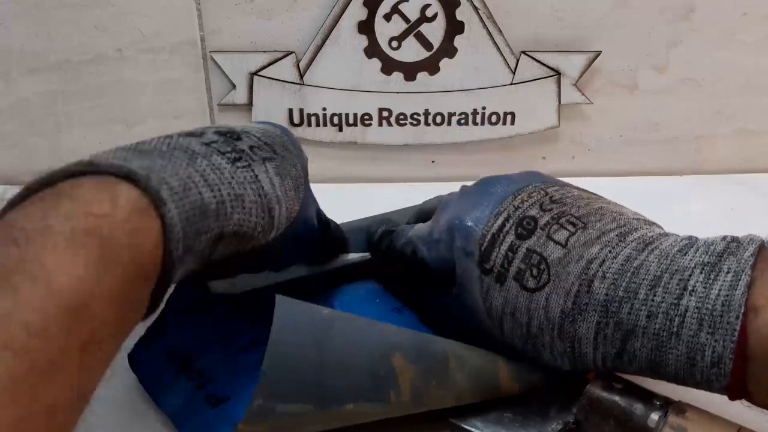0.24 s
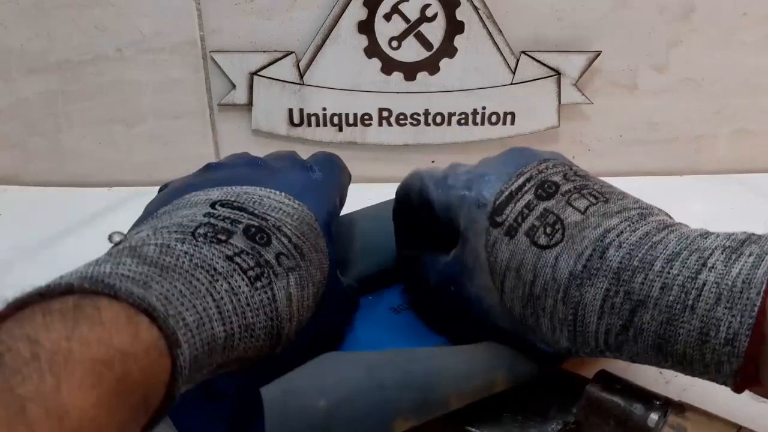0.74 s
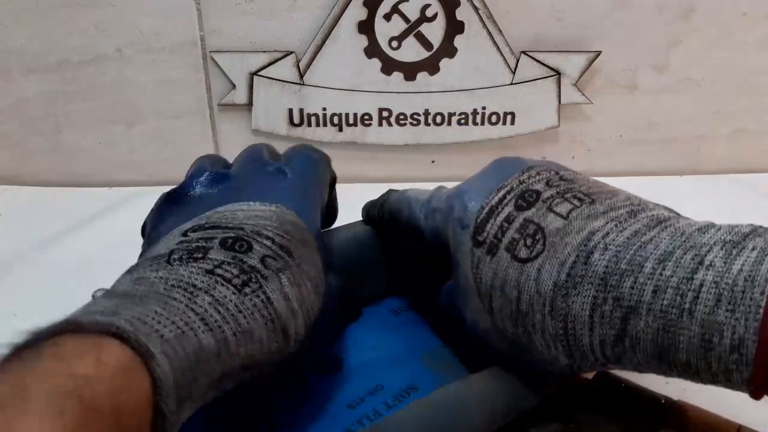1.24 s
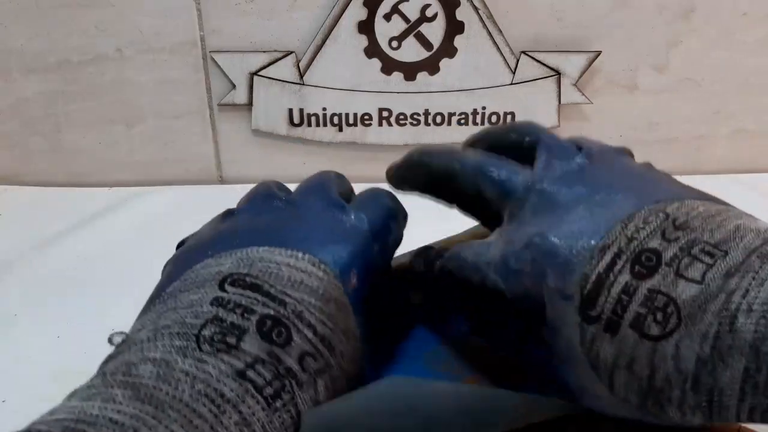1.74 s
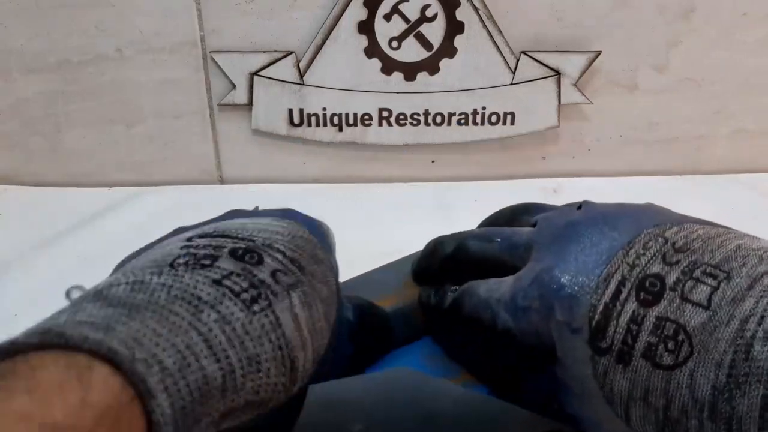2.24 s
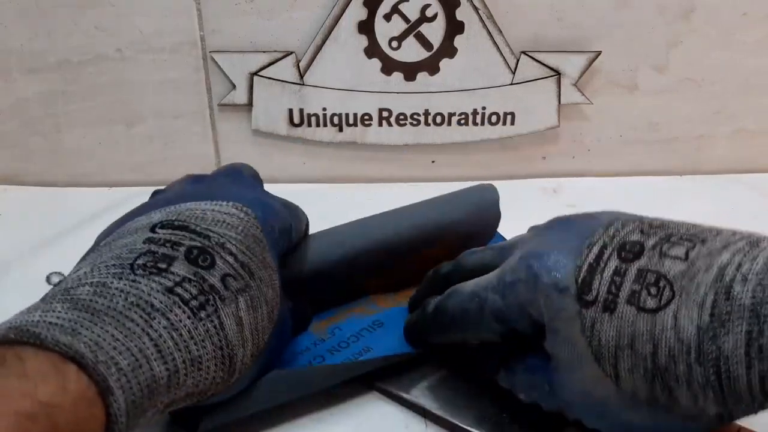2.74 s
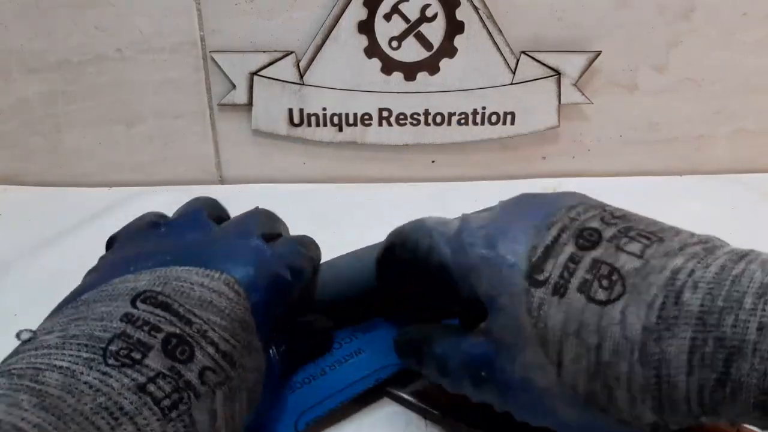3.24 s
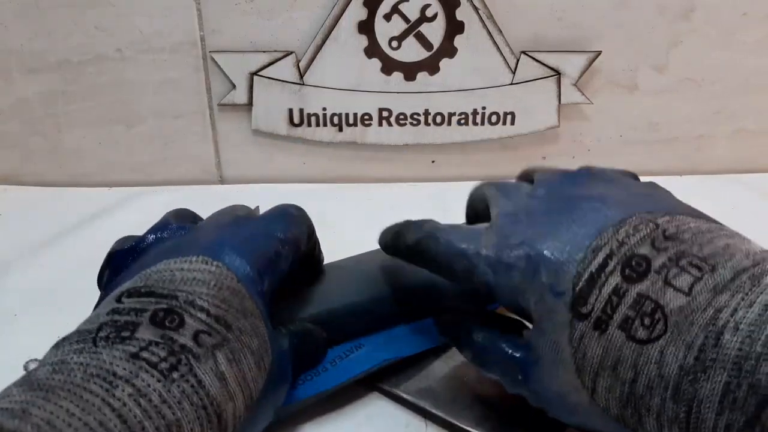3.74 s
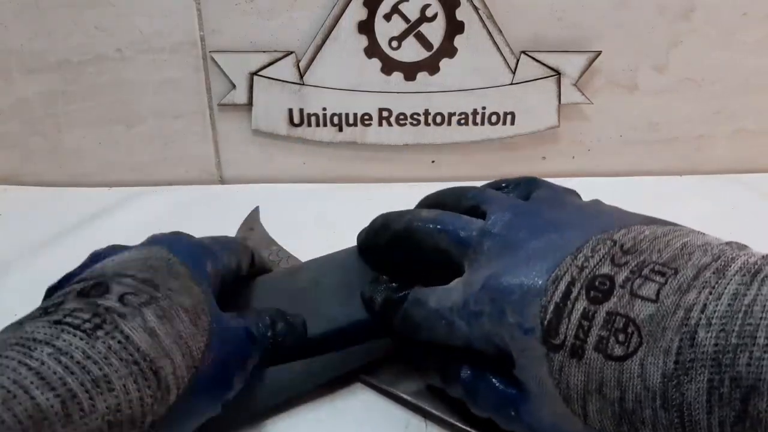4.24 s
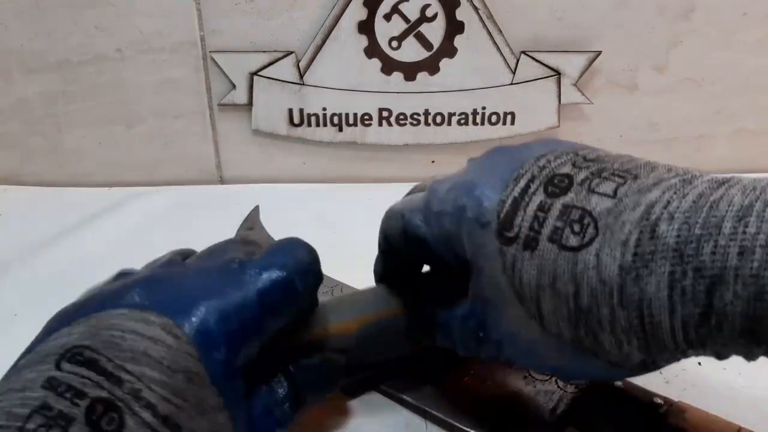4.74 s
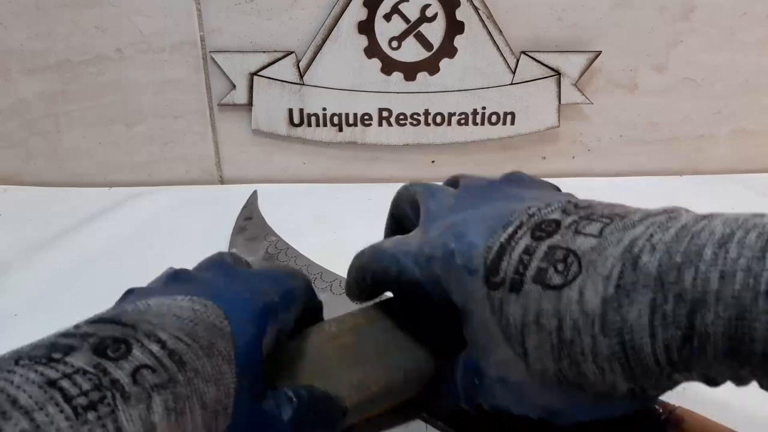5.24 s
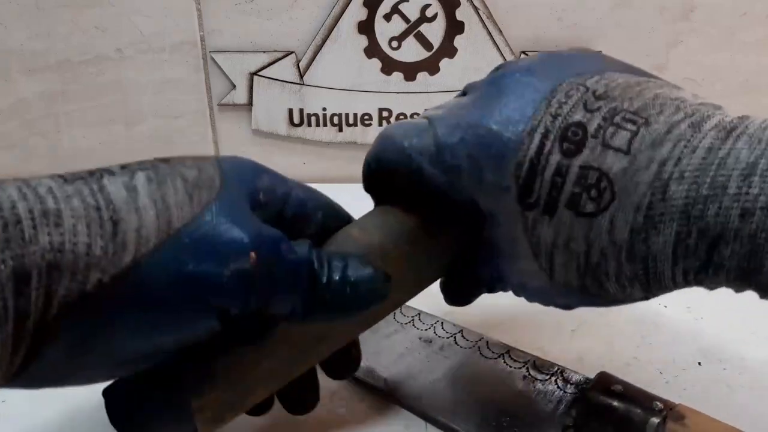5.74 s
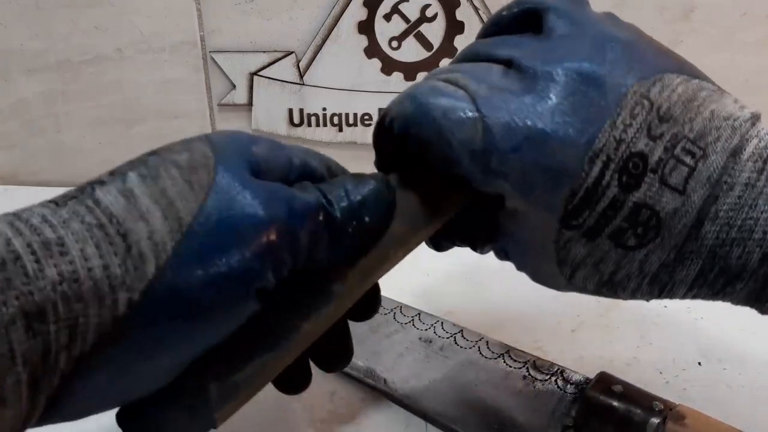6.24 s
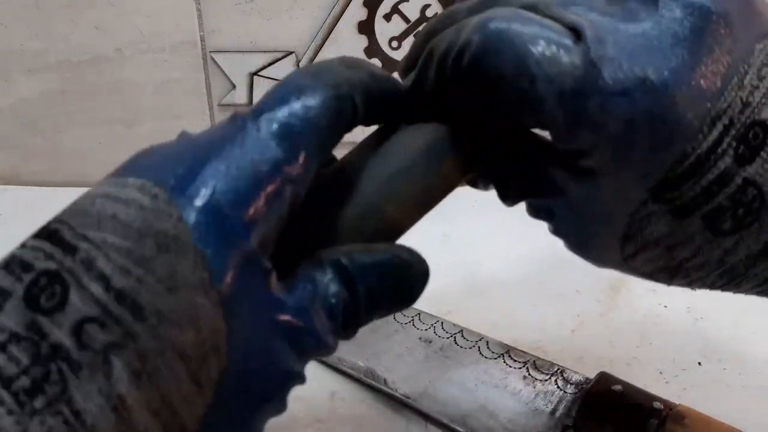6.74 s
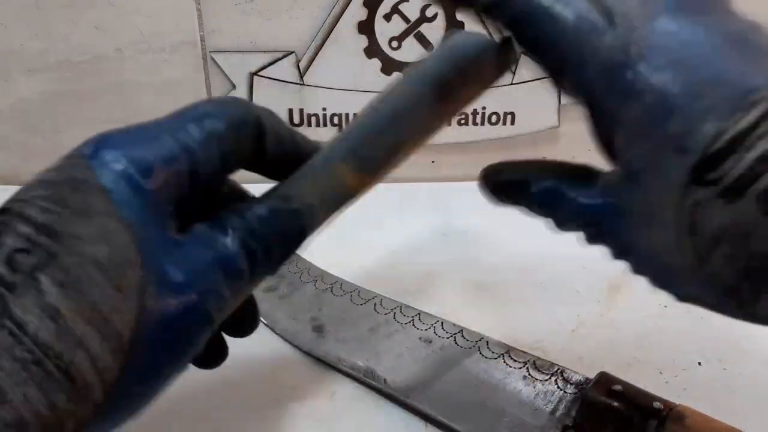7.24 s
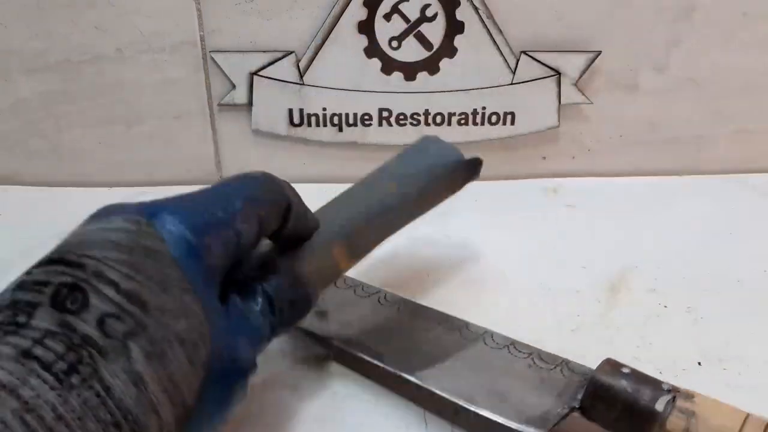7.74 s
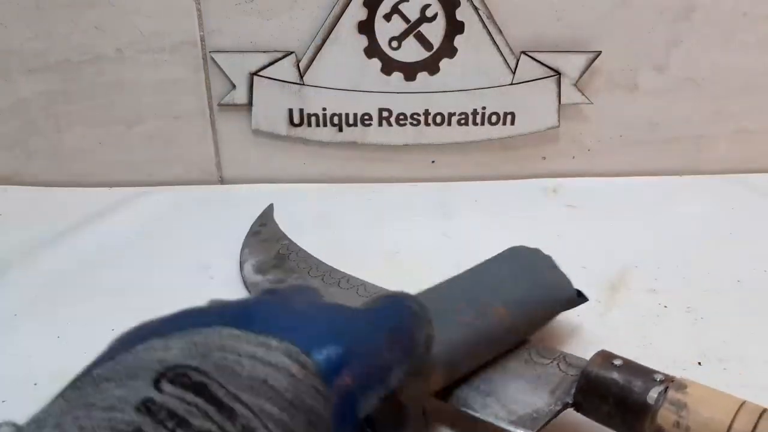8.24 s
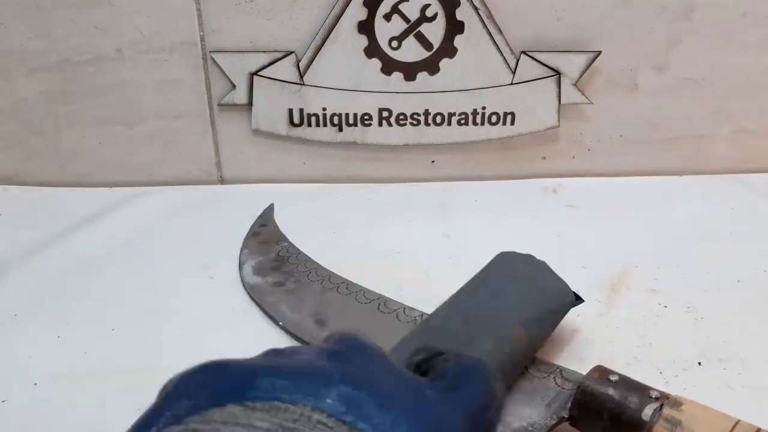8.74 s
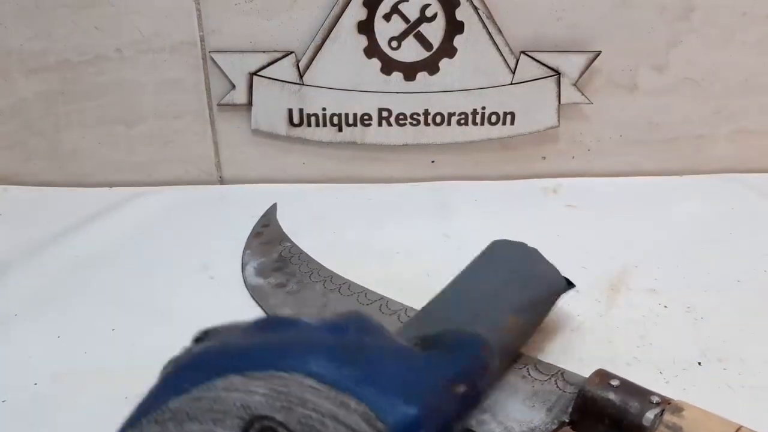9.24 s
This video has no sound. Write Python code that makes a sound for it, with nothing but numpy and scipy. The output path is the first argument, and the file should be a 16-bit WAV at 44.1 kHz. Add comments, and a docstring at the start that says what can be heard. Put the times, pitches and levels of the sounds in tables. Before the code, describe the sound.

Gloved hands work a stiff gritty sheet on a workbench, very close and dry with a short room reflection. Irregular scuffs, snaps and ticks come in bursts, with a sharp stone-on-steel knock around two seconds and others later, over bench thuds. After five seconds it thins to soft slips. A knock precedes fast grinding strokes on steel, seven or eight a second, until the end.

```python
"""Gloved hands wrap a stiff sheet of abrasive paper round a stone on a workbench in a small hard room.
From the start the sheet rustles, ticks and snaps, a fold breaks early on, the stone knocks on a steel
blade and the bench booms; later, rubber gloves swish. Over the last second and a half the wrapped stone
rubs along the blade in quick strokes, seven or eight a second, and catches on its edge.
Friction is random grit clicks through filters; blows are short clicks through resonances."""
import sys
import numpy as np
from scipy import signal
from scipy.fft import rfft, irfft
from scipy.io import wavfile
from scipy.ndimage import map_coordinates

SR = 44100
rng = np.random.default_rng(int(sys.argv[2]) if len(sys.argv) > 2 else 0)


def inscribe(sig):
    """Save sig as 16-bit PCM at rate SR to the path in sys.argv[1].

    A 1-D sig is mono; a 2-D sig holds one channel per row.
    Samples are clipped to [-1, 1] before scaling.
    """
    pcm = np.round(np.clip(np.atleast_2d(sig).T, -1, 1) * 32767)
    wavfile.write(sys.argv[1], SR, pcm.astype(np.int16))


N = 418509
TIME = np.arange(N) / SR


def from_db(db):
    """Decibels to gain."""
    return 10 ** (np.asarray(db) / 20)


def rms_one(x):
    """Scale to rms 1."""
    return x / np.sqrt(np.mean(x ** 2) + 1e-20)


def burst_one(x):
    """Scale each channel to the energy of 10 ms at rms 1."""
    energy = np.sum(x ** 2, axis=-1, keepdims=True)
    return x / np.sqrt(energy / (0.01 * SR) + 1e-20)


def at_hz(points, hz):
    """Read a table on a log-frequency axis."""
    point_hz, value = np.transpose(points)
    return np.interp(np.log(np.maximum(hz, 1)), np.log(point_hz), value)


def add(out, start_s, sound):
    """Mix a sound in at its start time."""
    i = max(round(start_s * SR), 0)
    out[..., i:i + sound.shape[-1]] += sound[..., :N - i]


def convolve(x, response):
    """Filter by an impulse response, keeping the length."""
    return signal.oaconvolve(np.atleast_2d(x), np.atleast_2d(response), axes=-1)[:, :x.shape[-1]]


def coloured(x, spectrum, size=4096):
    """Causal (minimum-phase) filter with the given spectrum."""
    hz = np.arange(size // 2 + 1) * SR / size
    cepstrum = irfft(np.log(from_db(at_hz(spectrum, hz))))
    # folding the cepstrum forward in time makes the filter minimum-phase
    cepstrum[1:size // 2] *= 2
    cepstrum[size // 2 + 1:] = 0
    return convolve(x, irfft(np.exp(rfft(cepstrum))))


def resonance(x, hz, width_hz):
    """Two-pole band-pass."""
    r = np.exp(-np.pi * width_hz / SR)
    return signal.lfilter([1, 0, -1], [1, -2 * r * np.cos(2 * np.pi * hz / SR), r * r], x)


def low_pass(x, hz, order=2):
    """Butterworth low-pass."""
    return signal.sosfilt(signal.butter(order, hz, fs=SR, output="sos"), x)


def drift(per_s, size=16):
    """Smooth random wander with a spread near 1, from per_s random knots a second."""
    knots = rng.standard_normal(4000)
    coarse = map_coordinates(knots, [TIME[::size] * per_s], order=2, mode="wrap")
    return np.repeat(coarse, size)[:N]


def ringing(modes, t, scatter_db):
    """Decaying modes, each struck with a strength of its own."""
    out = 0
    for k, (hz, db, t60_s) in enumerate(modes):
        decay = from_db(db + scatter_db * rng.normal() - 60 * t / t60_s)
        out = out + decay * np.sin(2 * np.pi * hz * t) * (-1) ** k
    return out


def grains(per_s, spread_db):
    """Grit catching and letting go: random clicks of very uneven size."""
    sizes = from_db(spread_db * np.minimum(rng.exponential(1, N), 5))
    return rms_one((rng.random(N) < per_s / SR) * sizes * rng.choice([-1, 1], N))


def friction(spectrum, per_s, spread_db, apart_db):
    """Grains over a wide contact, partly different at the two microphones."""
    shared = grains(per_s, spread_db)
    apart = from_db(apart_db) * grains(per_s, spread_db) * [[1], [-1]]
    return rms_one(coloured(shared + apart, spectrum))


def contact(decay_s, chatter_db, apart_db, size=4096):
    """One sharp click, then a dying noise chatter, up to 6 samples apart at the two microphones."""
    t = np.arange(size) / SR
    envelope = np.exp(-t / decay_s) * (1 - np.exp(-t / 0.0002))
    mid, side = rng.standard_normal((2, size)) * envelope
    both = (t == 0) + from_db(chatter_db) * (mid + from_db(apart_db) * side * [[1], [-1]])
    return np.array([np.roll(channel, lag) for channel, lag in zip(both, rng.integers(0, 7, 2))])


# colour of the room tone: pitch_hz [Hz], level_db [dB, relative]
ROOM_TONE = [(25, -15.5), (80, 14.5), (300, -17.5), (800, -0.5), (2000, -20.5), (7000, -10), (16000, -16.5)]


def room_tone():
    """Faint steady noise, independent at the two microphones."""
    return from_db(-73.5) * rms_one(coloured(rng.standard_normal((2, N)), ROOM_TONE))


# reverberation time of the small hard room: pitch_hz [Hz], t60_s [s]
ROOM_T60 = [(100, 0.35), (300, 0.56), (800, 0.29), (2000, 0.34), (5000, 0.22), (14000, 0.17)]


def room(x):
    """Dense reflections, different at each microphone, dying band by band."""
    t = np.arange(SR // 2) / SR
    edges_hz = np.geomspace(60, 19000, 9)
    white, tail = rng.standard_normal((2, len(t))), 0
    bins_hz = np.fft.rfftfreq(len(t), 1 / SR)
    for low, high in zip(edges_hz, edges_hz[1:]):
        inside = abs(bins_hz - (low + high) / 2) < (high - low) / 2
        band = irfft(rfft(white) * inside, len(t))
        tail = tail + band * from_db(-60 * t / at_hz(ROOM_T60, np.sqrt(low * high)))
    tail = tail * (1 - np.exp(-t / 0.00046))
    return convolve(x, tail / np.sqrt(np.sum(tail ** 2) / 2))


# hands and stone press on the bench top: start_s [s], level_db [dB before filtering], hardness_hz [Hz]
BUMPS = [(.285, -35.5, 140), (0.383, -36, 890), (0.977, -50.5, 120), (1.43, -49.5, 200), (1.798, -47, 130),
         (1.961, -28, 140), (2.245, -38, 90), (2.553, -33.5, 264), (3.449, -49, 300), (3.558, -41, 140),
         (3.916, -51, 250), (4.44, -50, 220), (4.613, -40, 131), (4.972, -47, 153), (7.493, -45.5, 221.5),
         (7.622, -48, 200), (7.668, -41.5, 304), (8.476, -51, 250)]
# modes of the bench top: pitch_hz [Hz], level_db [dB, relative], t60_s [s]
BENCH_MODES = [(57, -11, 0.46), (77.6, -0.5, 0.75), (106, -4, 0.46), (138, -6, 0.15), (162, -12, 0.1),
               (200, -0.5, 0.23)]


def bench():
    """Pushes swell into the low modes of the bench top; harder ones reach its higher modes."""
    out, t = np.zeros(N), np.arange(SR) / SR
    for start_s, level_db, hardness_hz in BUMPS:
        boom = ringing(BENCH_MODES, t, scatter_db=0.5) * (1 - np.exp(-t / 0.0029))
        add(out, start_s, from_db(level_db) * low_pass(boom, hardness_hz))
    return signal.sosfilt(signal.butter(4, 46, "high", fs=SR, output="sos"), out)


def bench_murmur(rubbing):
    """Pushing on the sheet also shakes the higher modes of the bench top."""
    shake = low_pass(rubbing.mean(axis=0), hz=405)
    boom = sum(from_db(db) * rms_one(resonance(shake, hz, width_hz=64)) for hz, db, _ in BENCH_MODES[2:])
    return from_db(-58.5) * rms_one(boom)


# hard knocks of stone on blade, plus some dry sheet snaps and dull bumps, all with a rattle:
# start_s [s], level_db [dB], rattle_s [s, decay], hardness_hz [Hz]
KNOCKS = [(0.3146, -24.5, 0.0015, 4200), (0.3785, -27.5, 0.0071, 350), (1.9544, -12, 0.025, 3960),
          (2.5523, -16, 0.01, 2320), (2.575, -23, .015, 330), (3.45, -25.5, 0.0022, 6000),
          (6.415, -45.5, .01, 900), (7.6671, -22.5, 0.026, 1730), (7.8954, -39.5, 0.0097, 3000),
          (8.4726, -28, 0.0043, 2600)]
# colour of the rattle: pitch_hz [Hz], level_db [dB, relative]
KNOCK_BODY = [(50, -16), (150, -4.5), (330, -0.5), (520, -2), (850, 5), (1300, -1), (3000, -6.5),
              (7000, -8), (16000, -17.5)]
# short ring under each blow, as of a blade on a bench: pitch_hz [Hz], level_db [dB, relative], t60_s [s]
BLADE_MODES = [(323, 7, 0.1), (436, -15.5, 0.38), (607, -17.5, 0.49), (830, -1, 0.19), (1140, -12, 0.28),
               (1390, 1.5, 0.077), (1410, -12, 0.52), (1630, -15, 0.2), (1810, -26, 0.29),
               (1850, -0.5, 0.18), (2236, -20, 0.14), (2500, -26, 0.24)]


def knocks():
    """Each blow is a filtered rattle over a brief ring; hardness sets how bright the rattle is."""
    out, t = np.zeros((2, N)), np.arange(SR // 2) / SR
    for start_s, level_db, rattle_s, hardness_hz in KNOCKS:
        rattle = contact(rattle_s, chatter_db=-11.5, apart_db=-2.0)
        rattle = low_pass(coloured(rattle, KNOCK_BODY), hardness_hz)
        add(out, start_s, from_db(level_db) * burst_one(rattle))
        ring = ringing(BLADE_MODES, t, scatter_db=-2.5)
        add(out, start_s, from_db(level_db - 7.5) * burst_one(ring))
    return out


# rubber gloves slip on the wrapped stone: peak_s [s], half_length_s [s, to 1/e], level_db [dB]
SWISHES = [(4.934, 0.019, -33), (6.54, 0.021, -47), (6.628, 0.017, -52), (6.788, 0.01, -55.5),
           (6.863, .022, -53.5), (6.915, 0.011, -54)]


def gloves():
    """Rubber slipping over grit gives a narrow, high, crackly swish."""
    slips = np.array([grains(per_s=2900, spread_db=8.5) for _ in range(2)])
    swish = resonance(slips, hz=5600, width_hz=2200)
    swish = rms_one(resonance(swish, hz=6000, width_hz=3500))
    return swish * sum(from_db(db) * np.exp(-((TIME - s) / length_s) ** 2) for s, length_s, db in SWISHES)


# light rubbing of gloves never quite at rest on the sheet, before the trims below:
# time_s [s], rustle_db [dB], scratch_db [dB]
FIDGET = [(0.0, -41, -47), (0.24, -53.5, -48), (0.5, -48.5, -49.5), (0.98, -55, -55.5), (1.21, -58, -56.5),
          (1.35, -53, -46), (1.77, -54.5, -58.5), (1.95, -42, -42), (2.33, -55, -55), (2.71, -54, -52),
          (3.9, -57.5, -55.5), (4.22, -50, -51.5), (4.66, -50.5, -54), (4.9, -51, -48), (5.18, -41, -51),
          (5.83, -57.5, -55), (7.15, -63, -59)]
# the hands hold still and the light rubbing drops: middle_s [s], length_s [s], drop_db [dB]
RESTS = [(0.082, 0.13, 7.5), (1.096, 0.027, 6.5), (1.882, .05, 4.5), (2.186, 0.049, 17), (2.31, 0.031, 8),
         (3.715, 0.11, 11), (4.55, 0.13, 3.5), (5.723, 0.048, 18), (6.721, .08, 11), (7.386, 0.27, 18.5)]
FIDGET_RUSTLE_DB, FIDGET_SCRATCH_DB = -3.5, -4.5   # trims


def fidget():
    """Gains of the rustle and the scratch that go on between slides and drop at each rest."""
    s, rustle_db, scratch_db = np.transpose(FIDGET)
    rest_db = 0
    for middle_s, length_s, drop_db in RESTS:
        rest_db = rest_db + drop_db * np.exp(-np.minimum(2 * abs(TIME - middle_s) / length_s, 2) ** 6)
    return (from_db(np.interp(TIME, s, rustle_db) + FIDGET_RUSTLE_DB - rest_db),
            from_db(np.interp(TIME, s, scratch_db) + FIDGET_SCRATCH_DB - rest_db))


def speed_of(peak_s, length_s):
    """A hand movement gathers speed, peaks and dies away."""
    swell = 0.51      # share of the length spent gathering speed
    flatness = 3.42   # 2 is a bell; higher holds the top speed for longer
    part = slice(max(int((peak_s - 2 * length_s) * SR), 0), int((peak_s + 2 * length_s) * SR))
    t = TIME[part] - peak_s
    side_s = length_s * np.where(t < 0, swell, 1 - swell)
    return part, np.exp(-abs(t / side_s) ** flatness)


# pushes of the sheet over the stone; from 8 s on, pitched grinding of stone on blade:
# peak_s [s], length_s [s], rustle_db [dB], pitch_hz [Hz], scratch_db [dB re rustle]
SLIDES = [(0.343, 0.19, -41, 855, -16), (0.472, 0.059, -48, 1070, -0.5), (0.62, .1, -37, 1140, -7),
          (0.731, 0.03, -41, 990, -6), (0.849, 0.034, -46, 850, -10), (0.968, 0.06, -51.5, 836, -8),
          (1.234, 0.082, -42.5, 850, -1), (1.37, .18, -41, 990, -9), (1.63, 0.076, -46, 840, -37),
          (1.775, 0.074, -37.5, 1320, -12), (2.127, 0.079, -43, 930, -6.5), (2.232, 0.034, -42, 1000, -8.5),
          (2.368, 0.023, -39, 1480, -7.5), (2.507, 0.13, -38.5, 1550, 5), (2.582, .13, -34.5, 835, -4.5),
          (2.786, 0.094, -39.5, 930, -8), (2.944, 0.19, -39, 1010, -8), (3.154, 0.063, -43, 1100, -15),
          (3.282, 0.072, -46, 750, -7), (3.445, .012, -27.5, 1000, -12.5), (3.547, 0.03, -36, 775, -9),
          (3.639, 0.067, -49, 930, 1), (3.804, .07, -52.5, 995, -37), (3.906, 0.048, -42, 780, -23),
          (4.107, 0.13, -43.5, 840, -6), (4.201, 0.074, -41, 900, -3.5), (4.374, 0.049, -35.5, 850, -10),
          (4.429, 0.038, -32.5, 1420, -9.5), (4.747, 0.15, -45.5, 1050, -0.5), (4.83, 0.047, -44, 840, -13),
          (4.961, 0.051, -31, 1170, -4), (5.083, 0.047, -34, 1140, -9.5), (5.208, 0.11, -30.5, 1230, -2),
          (5.324, 0.13, -42.5, 1130, 1), (5.479, 0.019, -48.5, 1350, 4.5), (5.585, 0.18, -47.5, 1110, 1.5),
          (5.874, .14, -55.5, 1370, 6), (6.353, 0.12, -50, 1405, -1.5), (6.533, 0.049, -50, 1440, -1),
          (6.625, .08, -56.5, 1770, 3.5), (6.932, 0.077, -69, 1100, -3), (7.162, .08, -58, 1220, -1),
          (7.629, .11, -64.5, 950, 1), (7.796, 0.05, -59.5, 760, -3), (7.943, 0.077, -47, 1100, -8),
          (8.076, .1, -39.5, 1275, -13), (8.466, 0.029, -34, 1290, -10), (9.107, 0.037, -47.5, 1300, 10.5),
          (9.384, 0.067, -39.5, 1900, 2)]
# moments when the sliding grit hisses finely, some of them on steel:
# peak_s [s], length_s [s], level_db [dB]
FINE_SLIDES = [(1.953, 0.032, -33), (2.509, 0.057, -26.5), (3.642, .05, -51), (4.745, 0.038, -41),
               (7.147, 0.047, -59), (7.901, 0.017, -43), (8.447, 0.031, -24.5)]
# colour of the rustle: pitch_hz [Hz], level_db [dB, relative]
RUSTLE = [(40, -29.5), (110, -27), (290, 4), (520, -1), (780, 1.5), (1100, -8.5), (1550, -3.5), (2300, -6),
          (4000, -18), (9000, -40.5)]
# colour of the scratching grit: pitch_hz [Hz], level_db [dB, relative]
SCRATCH = [(1000, -13), (2500, 1), (4000, 0), (5200, -0.5), (6600, -0.5), (8500, -8), (16000, -26)]
# colour of the fine grit: pitch_hz [Hz], level_db [dB, relative]
FINE_HISS = [(3000, -38), (6500, 2.5), (8500, 3), (13000, -0.5), (16000, -4.5)]


def handling():
    """Coarse grit rustles at a pitch of its own in each slide, fine grit hisses; slides swell and fade."""
    grip = drift(per_s=90)
    crinkle = from_db(2.0 * grip) * friction(RUSTLE, per_s=1700, spread_db=2.5, apart_db=-4.5)
    hollow = rms_one(resonance(crinkle, hz=757, width_hz=29))   # the hollow of the rolled sheet
    crinkle = rms_one(crinkle + from_db(-14.5) * hollow)
    scratch = from_db(1.8 * grip) * friction(SCRATCH, per_s=9000, spread_db=3.0, apart_db=-1.0)
    fine = from_db(2.2 * grip) * friction(FINE_HISS, per_s=12000, spread_db=3.5, apart_db=1.5)
    grit = scratch + from_db(-0.5) * fine

    light_rustle, light_scratch = fidget()
    loose = rms_one(from_db(-9.5) * crinkle + rms_one(resonance(crinkle, hz=1100, width_hz=990)))
    sway = from_db(0.5 * drift(per_s=22))
    out = sway * (light_rustle * loose + light_scratch * grit)

    for peak_s, length_s, rustle_db, pitch_hz, scratch_db in SLIDES:
        part, speed = speed_of(peak_s, length_s)
        pitched = rms_one(resonance(crinkle[:, part], pitch_hz, 0.8 * pitch_hz))
        rustle = rms_one(rms_one(crinkle[:, part]) + from_db(5.0) * pitched)
        out[:, part] += from_db(rustle_db) * speed * (rustle + from_db(scratch_db) * grit[:, part])
    for peak_s, length_s, level_db in FINE_SLIDES:
        part, speed = speed_of(peak_s, length_s)
        out[:, part] += from_db(level_db) * speed * fine[:, part]
    return out


# colour of a creasing crack: pitch_hz [Hz], level_db [dB, relative]
CRACK = [(300, -29.5), (1400, 0), (2200, 10.5), (2900, 4.5), (4200, 0.5), (6500, -3.5), (9000, -7.5),
         (16000, -20.5)]


def snap(pop_db, pitch_hz, crack_db, thud_db):
    """A panel of the sheet flips over: a damped pop, a thud of what lies under it, a crack from the crease."""
    flip = contact(decay_s=0.0036, chatter_db=-14.0, apart_db=-7.5)
    pop = resonance(resonance(flip, pitch_hz, 0.53 * pitch_hz), pitch_hz, 1.3 * pitch_hz)
    pop = low_pass(pop, 3.5 * pitch_hz)
    thud = low_pass(resonance(flip, hz=338, width_hz=165), hz=560)
    crack = coloured(flip, CRACK)
    sheet = from_db(pop_db) * (burst_one(pop) + from_db(crack_db) * burst_one(crack))
    return sheet + from_db(thud_db) * burst_one(thud)


TICKS_PER_S, WRAPPING_S = 8, 5.7
TICK_DB, TICK_SPREAD_DB = -0.5, -7.5   # re the rustle of that moment
TICK_HZ, TICK_SPREAD_OCTAVES = 850, 0.16


def ticks():
    """Small creases give way at random during the wrapping, louder while the sheet is being pushed."""
    out, effort = np.zeros((2, N)), fidget()[0]
    for peak_s, length_s, rustle_db, _, _ in SLIDES:
        part, speed = speed_of(peak_s, length_s)
        effort[part] = np.maximum(effort[part], from_db(rustle_db) * speed)
    for when, size, pitch in rng.random((round(TICKS_PER_S * WRAPPING_S), 3)):
        start_s = when * WRAPPING_S
        level_db = TICK_DB + TICK_SPREAD_DB * (2 * size - 1)
        pitch_hz = TICK_HZ * 2 ** (TICK_SPREAD_OCTAVES * (2 * pitch - 1))
        tick = snap(level_db, pitch_hz, crack_db=2, thud_db=level_db - 0.5)
        add(out, start_s, effort[int(start_s * SR)] * tick)
    return out


# the sheet buckles or is tapped: start_s [s], pop_db [dB], pitch_hz [Hz], crack_db [dB re pop]
SNAPS = [(0.2563, -30, 1550, 1), (0.3135, -18.5, 1600, -5.5), (0.5057, -32, 1410, -1.5),
         (0.6672, -18.5, 900, -1), (0.9017, -36.5, 620, -18), (1.01, -38.5, 990, -9),
         (1.3037, -32, 830, -16), (1.4301, -38, 650, -17), (1.5132, -30, 596, -8.5), (1.599, -31, 1420, -4),
         (1.709, -38, 1260, -3), (1.9401, -23.5, 834, -5), (2.5677, -25, 1490, 5.5),
         (2.7976, -26.5, 795, -12), (3.069, -33.5, 1670, 3), (3.122, -26.5, 890, -7.5),
         (3.2808, -29.5, 760, -16), (3.394, -36, 656, -10), (3.4921, -35, 750, -20), (3.524, -38, 634, -21),
         (4.0164, -40.5, 820, -13), (4.0511, -34.5, 1050, -11), (4.066, -30, 825, -2.5),
         (4.1742, -25.5, 930, -11.5), (4.237, -41, 694, -19), (4.6111, -44.5, 1430, -11),
         (4.6697, -34.5, 740, -13), (4.7681, -21, 825, -29), (4.8037, -27, 1170, -0.5),
         (4.832, -21.5, 710, -13), (5.5053, -28.5, 754, -39), (5.685, -42.5, 754, -16),
         (7.1927, -38, 1000, 1)]
THUD_DB, FIRM_POP_DB, THUD_FOLLOWS = -34, -27, 0.64   # thud under a firm pop; dB of thud per dB of pop


def snaps():
    """The separate snaps of the sheet; the thud grows more slowly than the pop."""
    out = np.zeros((2, N))
    for start_s, pop_db, pitch_hz, crack_db in SNAPS:
        thud_db = THUD_DB + THUD_FOLLOWS * (pop_db - FIRM_POP_DB)
        add(out, start_s, snap(pop_db, pitch_hz, crack_db, thud_db))
    return out


def fold_break():
    """The fold gives way all at once: one very short, bright crack over a small pop."""
    out = np.zeros((2, N))
    click = contact(decay_s=0.0014, chatter_db=-25.5, apart_db=2.5)
    crack = low_pass(resonance(click, hz=4800, width_hz=4600), hz=7730, order=4)
    pop = resonance(click, hz=1000, width_hz=800)
    add(out, 1.1803, from_db(-19) * (burst_one(crack) + from_db(-11.0) * burst_one(pop)))
    return out


# the stone catches on the blade's edge and hops: start_s [s], level_db [dB], pitch_hz [Hz]
CATCHES = [(8.6559, -16.5, 1140), (8.6608, -19, 1090)]


def catches():
    """Each catch is a short, hollow clack of the wrapped stone."""
    out = np.zeros((2, N))
    for start_s, level_db, pitch_hz in CATCHES:
        hit = contact(decay_s=0.0026, chatter_db=-20.0, apart_db=5.0)
        clack = resonance(resonance(hit, pitch_hz, width_hz=360), pitch_hz, width_hz=810)
        clack = low_pass(clack, hz=3300)
        crack = coloured(hit, CRACK)
        add(out, start_s, from_db(level_db) * (burst_one(clack) + from_db(-20.0) * burst_one(crack)))
    return out


# colour of the coarse grit: pitch_hz [Hz], level_db [dB, relative]
GRINDING = [(40, -8), (75, -3), (150, -9.5), (330, -2.5), (620, -12.5), (820, -5.5), (1450, -4), (2100, -4),
            (3200, -3.5), (7000, -4.5)]
# resonances of the blade under the stone: pitch_hz [Hz], width_hz [Hz]
PRESSED_BLADE = [(820, 250), (1250, 600), (1750, 580), (2150, 810)]


def grinding():
    """Coarse grit shakes the blade; as the contact shifts, now one resonance stands out, now another."""
    grit = friction(GRINDING, per_s=4000, spread_db=2.0, apart_db=-4.0)
    steel = 0
    for pitch_hz, width_hz in PRESSED_BLADE:
        sway = from_db(6.0 * drift(per_s=22))
        steel = steel + sway * rms_one(resonance(grit, pitch_hz, width_hz))
    return rms_one(grit + rms_one(steel))


# strokes on the blade: turn_s [s], early_db [dB, hiss], late_db [dB, hiss]
STROKES = [(8.038, -31.5, -23.5), (8.233, -25, -33.5), (8.362, -28.5, -31.5), (8.498, -19.5, -36),
           (8.641, -31.5, -25.5), (8.755, -27, -29), (8.877, -29, -29.5), (8.996, -29, -31),
           (9.12, -30.5, -29.5), (9.248, -29, -29.5), (9.378, -28.5, -34.5)]
LAST_TURN_S = 9.51
# colour of grit on steel: pitch_hz [Hz], level_db [dB, relative]
STEEL_HISS = [(800, -23), (2200, -31), (3300, -4.5), (5300, 1), (6700, 6.5), (9000, 5), (12800, 6),
              (16000, 1)]


def strokes():
    """The stone stops at each turn; between turns its speed and pressure set the rasp of grit on steel."""
    turn_s, early_db, late_db = np.transpose(STROKES)
    travel = np.interp(TIME, np.append(turn_s, LAST_TURN_S), np.arange(len(turn_s) + 1))
    k, phase = np.minimum(travel.astype(int), len(turn_s) - 1), travel % 1
    speed = np.sin(np.pi * phase)
    bite = np.tanh((speed / 0.43) ** 6.0)   # the grit cuts fully once the stone is under way
    hiss_db = early_db[k] + (late_db[k] - early_db[k]) * phase + 0.44 * drift(per_s=16)
    hiss = bite * from_db(hiss_db) * friction(STEEL_HISS, per_s=27000, spread_db=1.0, apart_db=1.0)
    grind = speed ** 0.1 * from_db(-38.5 + 2.0 * drift(per_s=78)) * grinding()
    return hiss * from_db([[-1.2], [1.0]]) + grind   # the hiss leans to the right


def scene():
    """Blows and rubbing in the room, over a faint room tone."""
    blows = snaps() + knocks() + catches() + fold_break()
    sheet = handling()
    rubbing = sheet + gloves() + strokes() + ticks()
    reflections = room(from_db(-8.5) * blows + from_db(-8.0) * rubbing)
    return blows + rubbing + bench() + bench_murmur(sheet) + reflections + room_tone()


# response of the microphones: pitch_hz [Hz], gain_db [dB]
MICROPHONE = [(30, 1), (7300, 2.5), (8200, -9), (9800, -5), (12500, 2.5), (16000, 0)]
# stereo width; the sound narrows most around 330 Hz: pitch_hz [Hz], gain_db [dB on left minus right]
WIDTH = [(50, -3), (160, -5.5), (330, -11), (650, -3), (1200, 1), (2500, 1.5), (5000, 0), (16000, -1)]


def record(dry):
    """Two close microphones; peaks beyond full scale flatten and the top is cut above 16.1 kHz."""
    left, right = coloured(dry, MICROPHONE)
    side = coloured((left - right) / 2, WIDTH)
    heard = np.clip((left + right) / 2 + side * [[1], [-1]], -1, 1)
    return signal.sosfilt(signal.ellip(12, 0.1, 80, 16100, fs=SR, output="sos"), heard)


dry = scene()
out = record(dry)
inscribe(out)
```